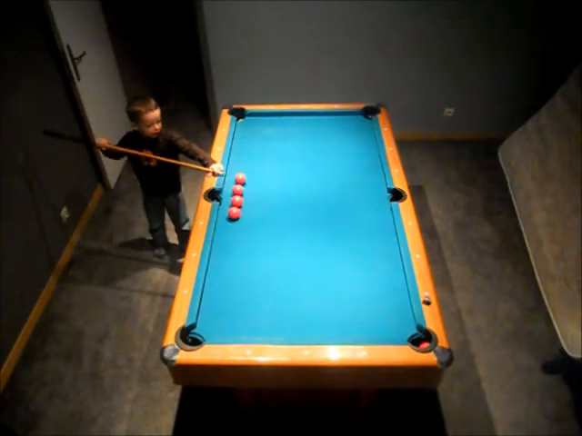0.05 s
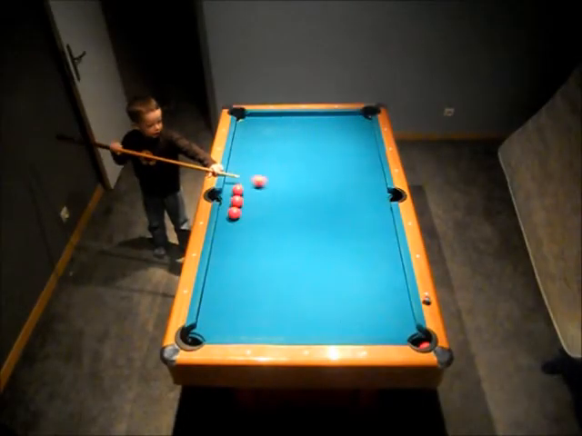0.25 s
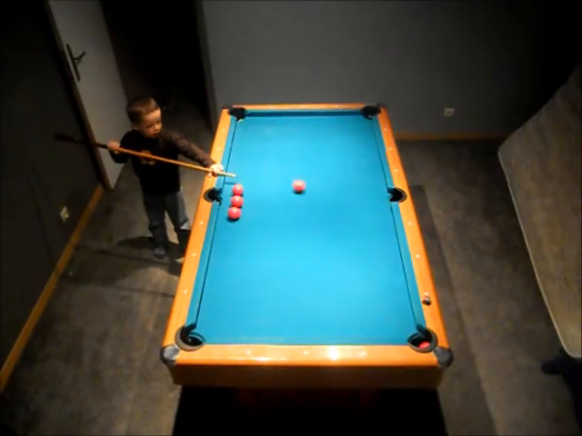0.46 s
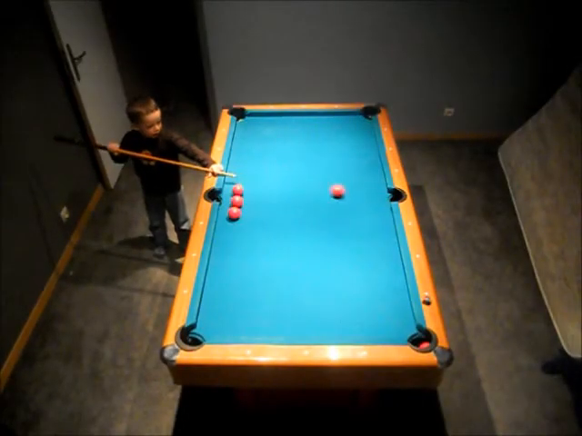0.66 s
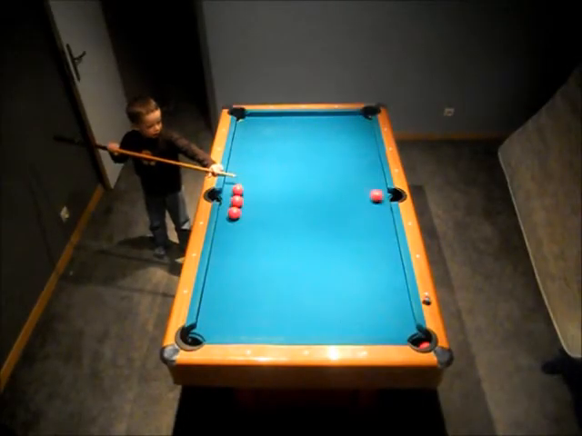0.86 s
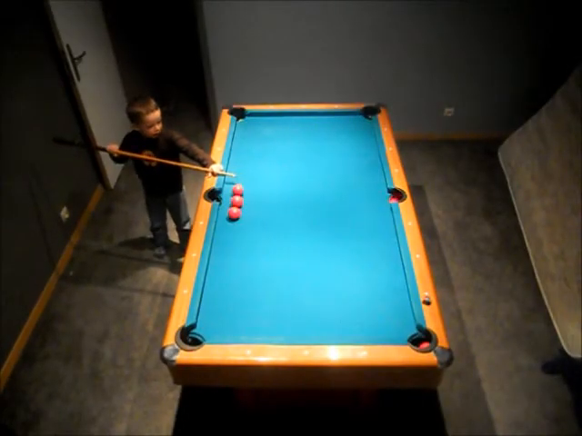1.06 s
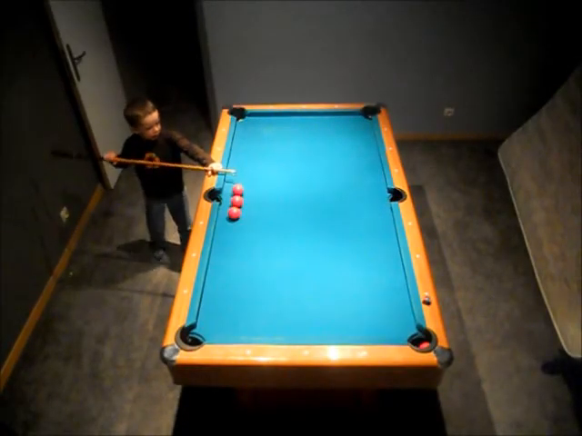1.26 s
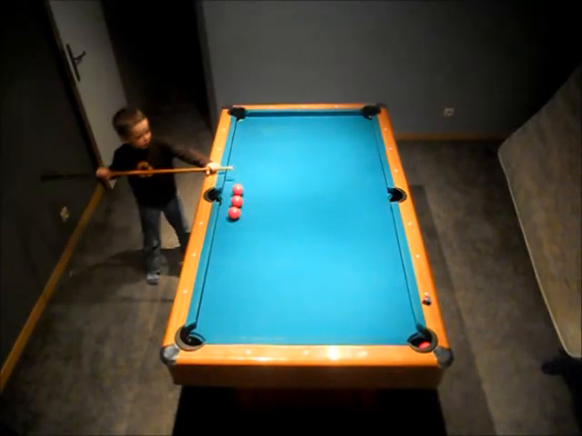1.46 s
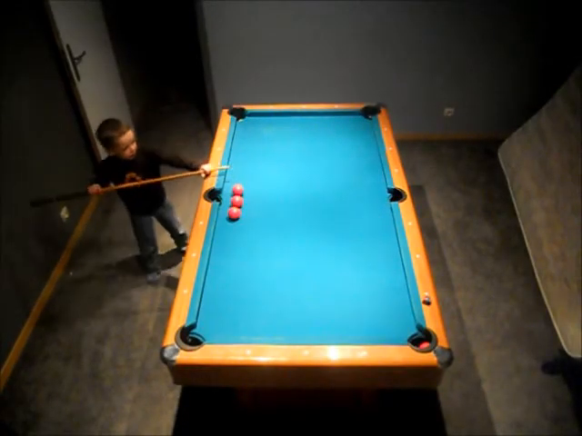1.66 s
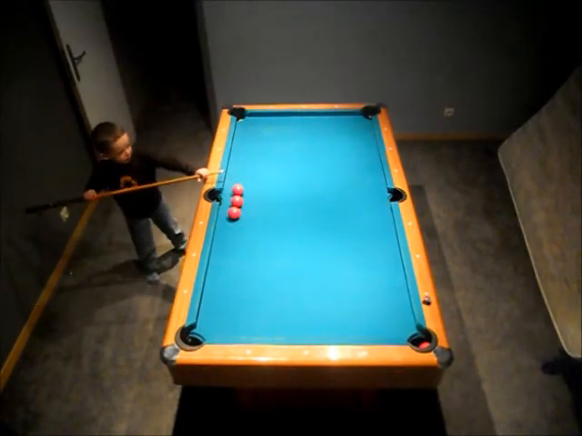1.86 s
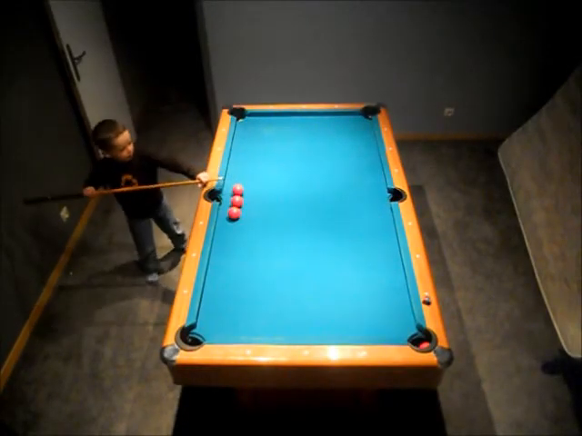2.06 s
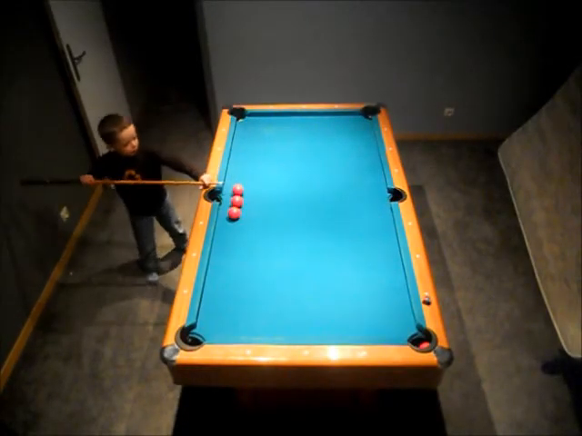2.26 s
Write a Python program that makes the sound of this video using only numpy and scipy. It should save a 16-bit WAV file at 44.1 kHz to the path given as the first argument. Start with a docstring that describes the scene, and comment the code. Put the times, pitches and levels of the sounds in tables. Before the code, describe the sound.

A pool ball is struck with a sharp clack and wooden thump in a small, echoing room. It rolls quietly, clatters into a pocket, drops with a low boom and rumbles off, over faint hiss that dips at the shot.

```python
"""A pool shot in a small, bare room: the cue thumps against ball and table, and a hard clack follows.
The ball rolls over the cloth, rattles into a pocket, drops with a boom and rumbles away inside the table.
The blows set the wooden table ringing, and the room echoes them. Behind it all is a soft hiss.
An automatic gain control turns everything down at the shot and lets it swell back a second later."""
import sys
import numpy as np
from scipy import signal
from scipy.fft import rfft, irfft
from scipy.io import wavfile
from scipy.ndimage import minimum_filter1d

SR = 44100
rng = np.random.default_rng(int(sys.argv[2]) if len(sys.argv) > 2 else 0)


def master_out(mix):
    """Clip the mix to full scale and print it as 16-bit PCM to the path in sys.argv[1]."""
    frames = np.transpose(np.atleast_2d(mix))
    ceiling = np.clip(frames, -1, 1)
    pcm = np.round(ceiling * 32767).astype(np.int16)
    wavfile.write(sys.argv[1], SR, pcm)


N = 101430
TIME = np.arange(N) / SR

# Tone colours of noise. Each row: frequency in Hz, relative strength there in dB.
BACKGROUND_COLOUR = [(20, -6), (45, -10.5), (70, -10.5), (110, -9.5), (220, -10), (450, -11.5),
                     (1000, -12.5), (2500, -17), (5000, -19), (10000, -22.5)]   # room rumble and microphone hiss
CLICK_COLOUR = [(100, -8), (500, -2.5), (1400, 6), (1950, -1.5), (2700, 3), (4200, -4.5), (6500, -12),
                (10000, -20)]   # the ball hitting the pocket
KNOCK_COLOUR = [(30, -19), (75, -7.5), (200, -3), (430, 3), (700, -9), (1100, -16.5), (1600, -17.5),
                (2500, -22), (4000, -46), (9000, -50)]   # the echo of a wooden knock
TIP_COLOUR = [(500, 0), (1300, 13), (1900, -3), (3000, -8.5), (6000, -7.5), (10000, -8.5)]   # the tick of the cue tip
THUMP_COLOUR = [(30, -24), (70, -15.5), (160, -8.5), (280, 3.5), (450, 0), (650, -7), (1050, -10.5),
                (1700, -29.5), (2700, -31.5), (4200, -37.5), (9000, -46.5)]   # the echo of the cue's thump
# The room's echo. Each row: frequency in Hz, fade time in seconds (the time to lose 60 dB).
ROOM_FADES = [(60, 0.64), (220, 0.59), (500, 0.44), (1000, 0.52), (2500, 0.33), (5000, 0.31), (10000, 0.29)]
# Low hums that rolling stirs up. Each row: pitch in Hz, width in Hz, relative level in dB.
CLOTH_HUMS = [(103, 19, 3), (171.5, 10.4, 2), (217.3, 4.7, -1.5), (272, 23, -7), (333, 20, -3.5)]
CHANNEL_HUMS = [(26.8, 2.6, 2.5), (68.7, 5.7, 1), (213.6, 26, -5.5), (263, 7.5, -11)]
# The ball hits the pocket's rim, its lining and the return channel inside the table.
# Each row: start in seconds, relative click level in dB, relative knock level in dB.
POCKET_HITS = [(0.9872, -17, -17), (1.001, -24, -11.5), (1.0248, -18, -18.5), (1.034, -21.5, -1.5),
               (1.0593, -15.5, -20.5), (1.127, -20.5, -17.5), (1.275, -36, -30.5), (1.44, -38, -38)]
# Tones that ring after a blow. Each row: pitch in Hz, relative level in dB, fade time in seconds.
POCKET_TONES = [(151.2, -18, 0.83), (216, -10, 0.73), (267, -2, 0.48), (299, -17, 0.78), (371.6, 2, 0.25),
                (412, -8, 0.16), (488, -0.5, 0.33), (561, -9, 0.42), (702, -13, 0.41), (791, -12.5, 0.45)]   # pocket and cabinet
TABLE_TONES = [(98.8, -17, 1.7), (132, 0, 0.12), (155, -10, 0.51), (218, -7, .7), (259.4, 1.5, 0.47),
               (268.5, -7, .45), (307.2, -9, 0.45), (390.2, 2.5, 0.49), (455, -6.5, 0.47),
               (516, -8.5, 0.41), (549.4, -4.5, 0.42), (570, -15.5, 0.62), (723.4, -14, 0.56),
               (855, 1.5, 0.095), (925, -3, 0.22), (1132, -10.5, 0.22)]   # table and room
CLACK_TONES = [(2260, -25.5, 0.45), (2775, -8.5, 0.018), (3530, -2.5, 0.0088), (3690, -1, 0.0093),
               (4140, -15.5, .01), (4630, -8, .01)]   # the hard clack
# The clack is a few very quick contacts. Each entry: relative level of one contact in dB.
CONTACT_LEVELS = [4, -5, -5.5, -3, -18.5, -21]


def from_db(db):
    """Turn decibels into a number to multiply a sound by."""
    return 10 ** (np.asarray(db) / 20)


def rms_one(x):
    """Scale a sound so its average strength (rms) is one."""
    return x / np.sqrt(np.mean(x ** 2) + 1e-20)


def at_hz(points, hz):
    """Read between a table's rows, giving each octave equal space."""
    row_hz, values = np.transpose(points)
    return np.interp(np.log(np.maximum(hz, 1)), np.log(row_hz), values)


def decay(fade_s):
    """A fade that loses 60 dB in fade_s seconds."""
    return np.exp(-np.log(1000) * TIME / fade_s)


def rise(rise_s):
    """A fade-in, about two thirds up after rise_s seconds."""
    return 1 - np.exp(-TIME / rise_s)


def delayed(x, start_s):
    """The sound x, starting at start_s seconds."""
    return np.concatenate([np.zeros(int(max(start_s, 0) * SR)), x])[:N]


def tone(hz):
    """A pure, steady tone."""
    return np.sin(2 * np.pi * hz * TIME)


def noise(colour):
    """Steady noise with the given tone colour."""
    hz = np.arange(N // 2 + 1) * SR / N
    strength = from_db(at_hz(colour, hz)) * (hz > 15)
    phases = np.exp(2j * np.pi * rng.random(len(hz)))
    return rms_one(irfft(strength * phases, N))


def ring(tones, spread_db=0):
    """A struck object rings with fading tones; spread_db varies their levels by chance."""
    return sum(from_db(db + spread_db * rng.normal()) * tone(hz) * decay(fade_s)
               for hz, db, fade_s in tones)


def background():
    """Room rumble, microphone hiss and a faint electronic whine."""
    return from_db(-37.5) * noise(BACKGROUND_COLOUR) + from_db(-56) * tone(7852)


def room_echo(colour):
    """The walls blur a blow into noise, and each octave dies away at its own rate."""
    spectrum = rfft(noise(colour))
    centres_hz = np.geomspace(40, 10240, 9)
    octave = np.log2(np.clip(np.arange(len(spectrum)) * SR / N, centres_hz[0], centres_hz[-1]))
    echo = 0
    for hz in centres_hz:
        share = np.maximum(1 - abs(octave - np.log2(hz)), 0)
        echo += irfft(spectrum * share, N) * decay(at_hz(ROOM_FADES, hz))
    return echo * rise(0.0019)


def rolling(hums, start_s, end_s, db, fade_db_per_s, edge_s=0.051):
    """Small bumps under the ball make the table hum, fading as the ball slows."""
    rumble = 0
    for hz, width_hz, hum_db in hums:
        bumps = rng.standard_normal(N)
        damping = np.exp(-np.pi * width_hz / SR)
        feedback = [1, -2 * damping * np.cos(2 * np.pi * hz / SR), damping ** 2]
        hum = signal.lfilter([1, 0, -1], feedback, bumps)   # a filter that rings at hz
        rumble += from_db(hum_db) * rms_one(hum)
    muffled = signal.sosfilt(signal.butter(2, 600, fs=SR, output="sos"), rumble)
    on_off = np.clip(np.minimum(TIME - start_s, end_s - TIME) / edge_s + .5, 0, 1)
    return rms_one(muffled) * on_off * from_db(db - fade_db_per_s * (TIME - start_s))


def ball_drop(swell_s=0.03):
    """The ball lands at the bottom of the pocket: a deep thud swells and the table booms on."""
    age = TIME / swell_s
    swell = (age * np.exp(1 - age)) ** 2
    thud = from_db(-8) * swell * tone(hz=68.5)
    boom = from_db(-19) * rise(swell_s) * decay(1.26) * tone(hz=66)
    return thud + boom


def pocket_rattle():
    """Each hit makes a sharp click and a knock of the wooden cabinet, both with an echo."""
    rattle = 0
    for start_s, click_db, knock_db in POCKET_HITS:
        direct = from_db(5.5) * noise(CLICK_COLOUR) * decay(0.0088)
        off_ceiling = from_db(0.5) * delayed(direct, 0.0056)
        click = direct + off_ceiling + from_db(-3) * room_echo(CLICK_COLOUR)
        wood = ring(POCKET_TONES, spread_db=3) * rise(0.0054)   # wood takes a moment to get moving
        knock = from_db(-3) * (wood + room_echo(KNOCK_COLOUR))
        rattle += delayed(from_db(click_db) * click + from_db(knock_db) * knock, start_s)
    return rattle


def cue_shot(thump_s=.2072, clack_s=.2103, contacts_per_s=921):
    """The table thumps and the cue tip ticks, then comes the hard, chattering clack."""
    # Under a soft tip, the table gives off mostly this range, in Hz.
    band = signal.butter(2, [130, 1450], "band", fs=SR, output="sos")
    wood = signal.sosfilt(band, ring(TABLE_TONES) * rise(0.00093))
    thump = from_db(4.5) * wood + from_db(6.5) * room_echo(THUMP_COLOUR)
    tick = from_db(-3) * noise(TIP_COLOUR) * decay(0.072) * rise(0.0018)   # spread by nearby surfaces
    contact = from_db(-1.5) * ring(CLACK_TONES)
    clack = sum(from_db(db) * delayed(contact, clack_s + k / contacts_per_s)
                for k, db in enumerate(CONTACT_LEVELS))
    return delayed(thump + tick, thump_s) + clack


def scene():
    """The shot, the roll and the fall into the pocket, heard at one microphone."""
    cloth = rolling(CLOTH_HUMS, start_s=.3, end_s=.99, db=-28.5, fade_db_per_s=3)
    channel = rolling(CHANNEL_HUMS, start_s=1.23, end_s=N / SR, db=-24, fade_db_per_s=29)
    drop = delayed(ball_drop(), start_s=1.124)
    return (cue_shot() + cloth + pocket_rattle() + drop + channel + background())[None]


def gain_control(x, threshold_db=9, max_cut_db=15.5, attack_s=0.00065, hold_s=0.93, release_s=0.83):
    """A loud peak pulls the volume down; it stays there a while, then creeps back."""
    over_db = 20 * np.log10(abs(x) + 1e-9) - threshold_db
    wanted_gain = from_db(-np.clip(6 * over_db, 0, max_cut_db))
    half_hold = int(hold_s * SR / 2)
    held_gain = minimum_filter1d(wanted_gain, 2 * half_hold + 1, origin=half_hold, mode="constant", cval=1)
    release = np.exp(-TIME / release_s)
    cut = np.maximum.accumulate((1 - held_gain) / release) * release   # each cut wears off slowly
    smoothing = np.exp(-1 / (attack_s * SR))
    smooth_cut = signal.lfilter([1 - smoothing], [1, -smoothing], cut)
    return x * (1 - smooth_cut)


def record(dry, cutoff_hz=10400):
    """Apply the gain control, flatten peaks that are still too loud and cut the highest treble."""
    clipped = np.clip(gain_control(dry[0]), -.97, .97)
    treble_cut = signal.ellip(8, .3, 70, cutoff_hz, fs=SR, output="sos")
    return signal.sosfilt(treble_cut, clipped)[None]


dry = scene()
out = record(dry)
master_out(out)
```